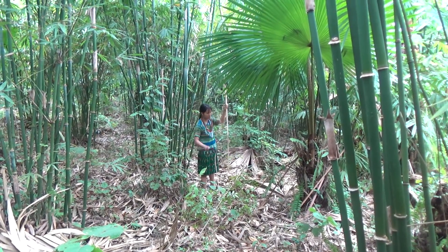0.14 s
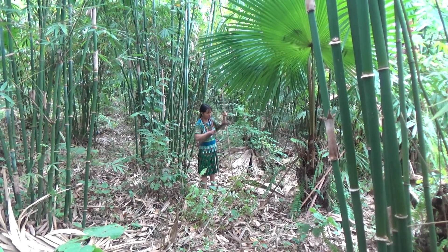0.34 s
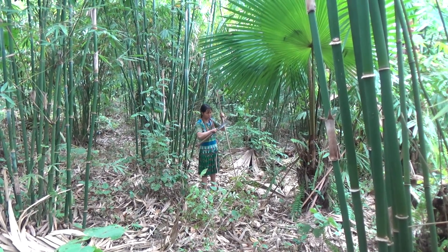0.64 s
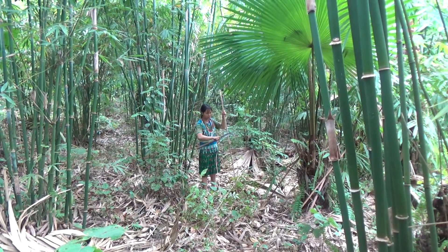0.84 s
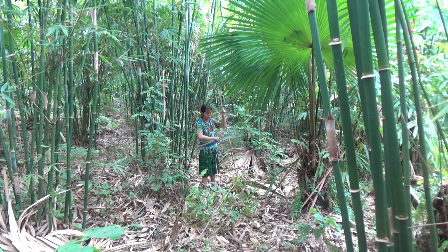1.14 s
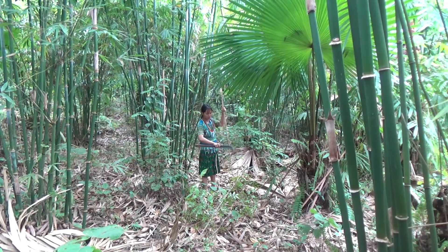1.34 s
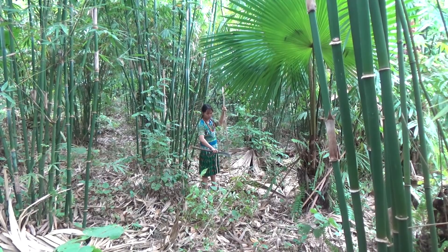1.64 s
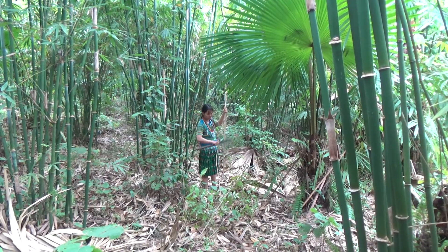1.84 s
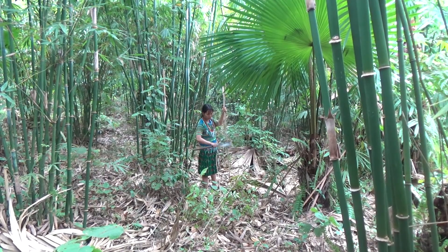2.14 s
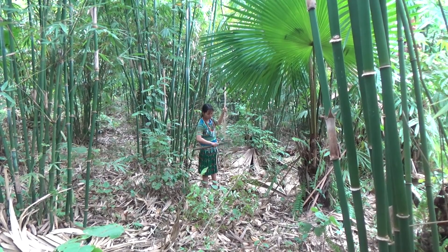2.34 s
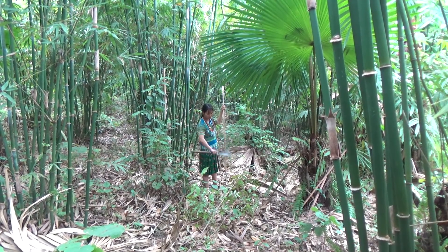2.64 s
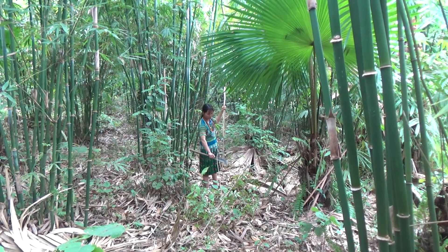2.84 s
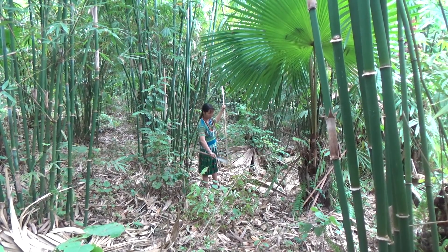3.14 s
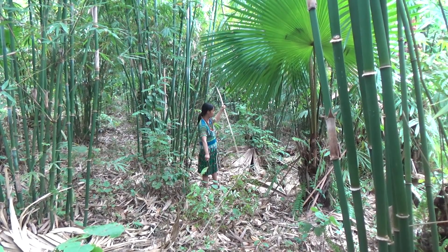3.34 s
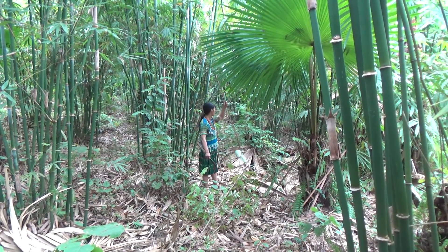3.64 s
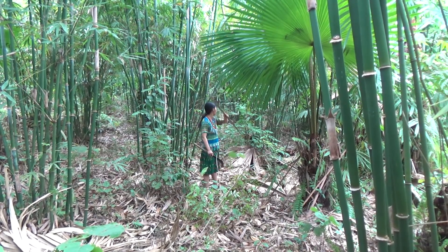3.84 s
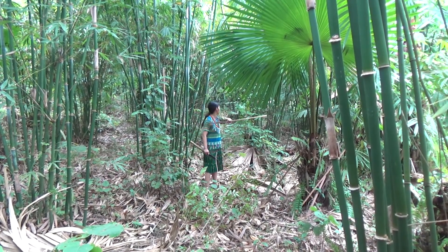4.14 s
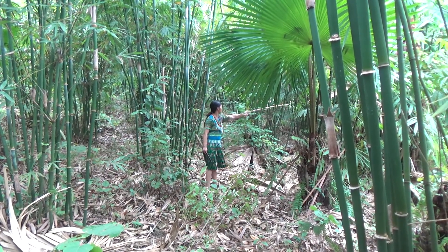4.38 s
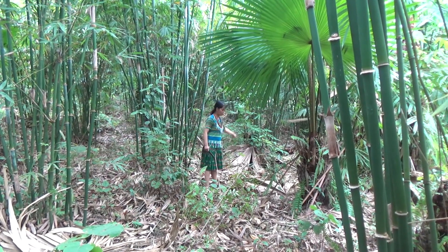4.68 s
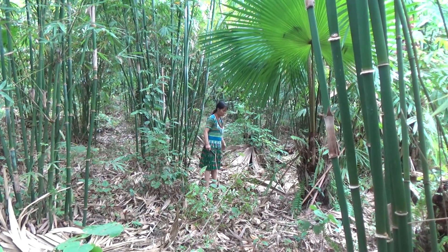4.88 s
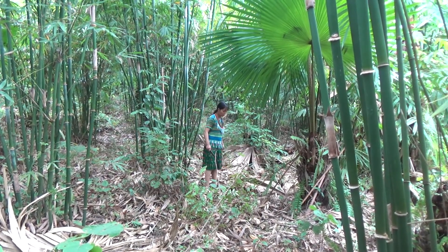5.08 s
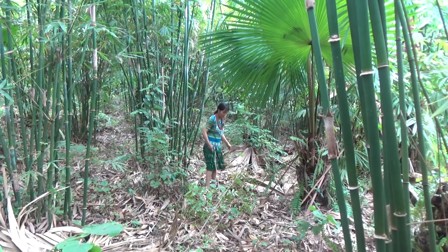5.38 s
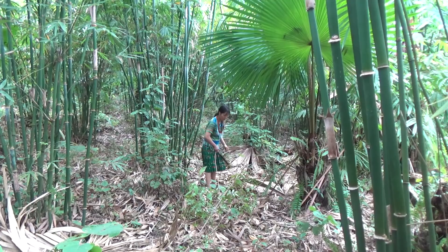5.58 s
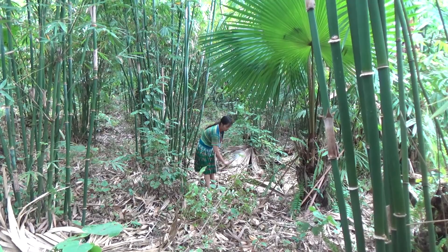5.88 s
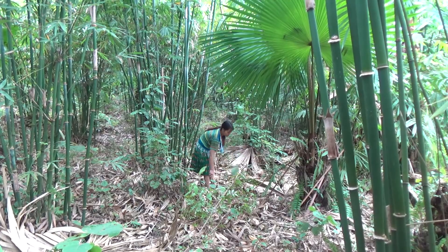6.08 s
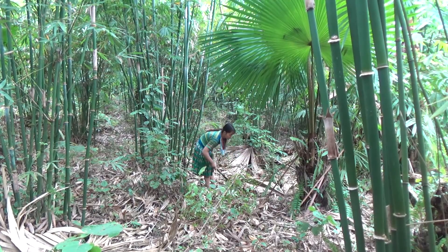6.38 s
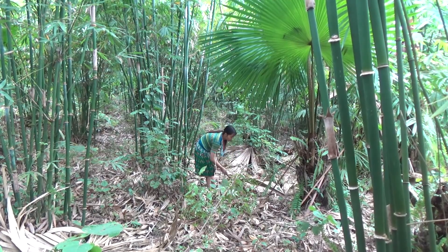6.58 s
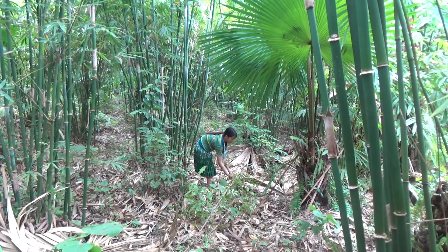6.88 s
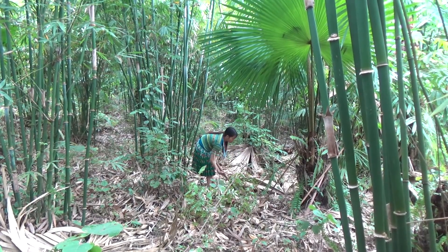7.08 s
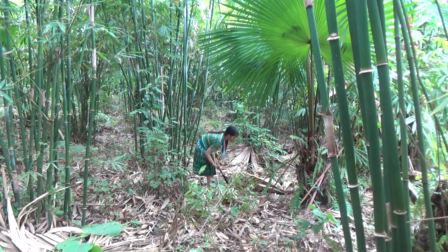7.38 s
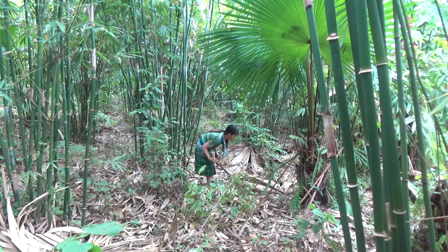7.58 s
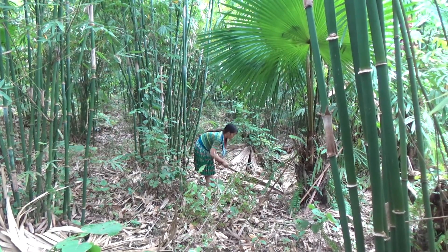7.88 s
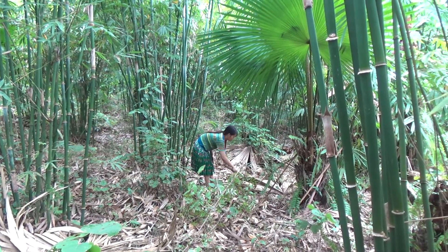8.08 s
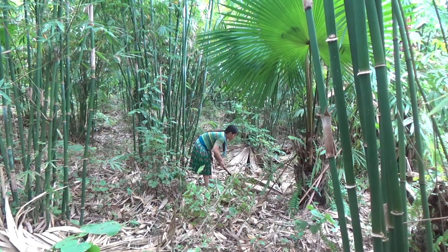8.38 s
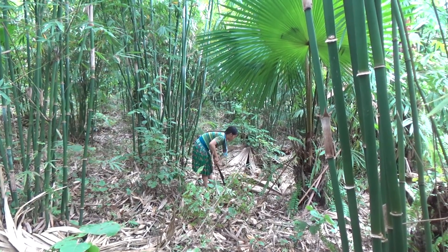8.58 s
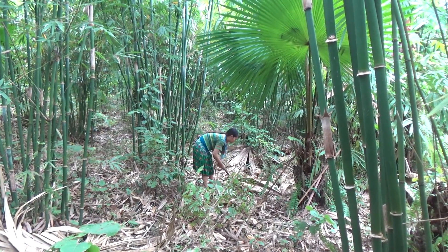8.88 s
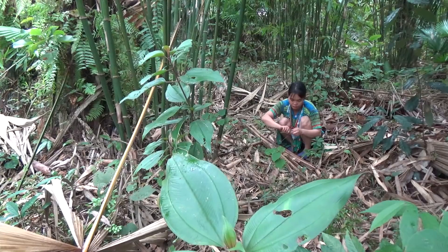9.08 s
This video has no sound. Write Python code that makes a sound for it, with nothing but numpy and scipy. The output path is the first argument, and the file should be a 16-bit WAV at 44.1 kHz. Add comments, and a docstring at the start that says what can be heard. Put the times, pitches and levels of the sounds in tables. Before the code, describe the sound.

Soft forest rumble and hiss run throughout, with a faint wavering whine like a small motor. From about 0.7 to 3 seconds a long steel blade scrapes along its sheath in short, catching strokes with a thin, high ring, the sharpest click at 1.2 seconds. A hollow bamboo cane knocks lightly in the hand between 2 and 4 seconds. Feet shuffle quietly in dry leaves from 3 seconds, and just after 5 the tossed cane lands with a swish. At 6 seconds comes a loud, slash-like crunch with sharp snaps. From about 7 to 7.7 seconds the leaves are raked and crushed while hollow stalks break. A far bird gives one very faint rising whistle around 8 seconds. A second slash-like crunch follows at 8.3, then a sharp snap and smaller crackles fading by 9. The grove adds short echoes, and the sound is nearly mono.

```python
"""A long steel blade scrapes along its sheath in a bamboo grove, sticking and slipping so the edge rings.
A hollow cane knocks in the hand and is tossed aside. Dry leaves crunch under steps, raking and what
sound like two blade slashes, and single stems snap. The canes scatter each sound back, over soft
forest noise, one far bird and a faint whine like a small motor's."""
import sys
import numpy as np
from scipy import signal
from scipy.fft import rfft, irfft
from scipy.io import wavfile
from scipy.ndimage import uniform_filter1d

SR = 44100
rng = np.random.default_rng(int(sys.argv[2]) if len(sys.argv) > 2 else 0)


def to_wav(s):
    """Save 16-bit WAV."""
    ch = np.atleast_2d(s).T  # columns
    pcm = np.round(np.clip(ch, -1, 1) * 32767)  # PCM
    wavfile.write(sys.argv[1], SR, pcm.astype(np.int16))


N = 406602

# Levels in the tables are relative: each layer gets its own trim in the mix.
# Strokes of the blade. Each row: start in seconds, length in seconds, level in dB.
BLADE_STROKES = [(.745, .075, -39.5), (.822, .022, -36), (1.027, .06, -60), (1.214, .042, -33.5),
                 (1.275, .06, -43), (1.322, .028, -38), (1.6, .07, -47), (1.674, .045, -41),
                 (1.894, .03, -47.5), (1.955, .06, -48), (2.112, .1, -41.5), (2.22, .06, -46.5),
                 (2.279, .015, -38.5), (2.392, .03, -53), (2.55, .15, -50.5), (2.694, .085, -44),
                 (2.96, .13, -58.5)]
# The edge catches on the sheath. Each row: start in seconds, level in dB.
EDGE_CATCHES = [(.6933, -32), (.7607, -28), (.7771, -25), (.8295, -25), (1.2384, -21), (1.2491, -13.5),
                (1.3464, -21), (1.514, -34.5), (1.5683, -32), (1.6302, -30), (1.6751, -24), (1.7085, -28),
                (1.9699, -27), (1.9984, -30), (2.1196, -27), (2.1465, -23), (2.2837, -21), (2.7087, -27)]
# The ring of the steel. Each row: pitch in Hz, 60 dB decay time in seconds, level in dB.
STEEL_MODES = [(3660, .04, -18), (4470, .035, -17), (6450, .05, -14), (7915, .15, -2.5), (7965, .11, -5),
               (9130, .11, -4), (9290, .09, -6), (10230, .1, -12), (10520, .12, -8), (11400, .1, -14),
               (11720, .14, -9), (13000, .14, -10), (14300, .12, -16)]
# EQ of the scrape. Each row: frequency in Hz, level in dB.
SCRAPE_EQ = [(200, -26), (750, -12), (1200, -14.5), (2100, -7.5), (3000, -9), (4200, -5), (5800, -5.5),
             (8000, -1.5), (10000, 2.5), (12500, -3.5), (15500, -11.5)]

# Knocks on the cane in the hand. Each row: start in seconds, level in dB.
CANE_KNOCKS = [(1.915, -38), (2.005, -37), (2.147, -37), (2.175, -35), (2.284, -36), (2.66, -40),
               (2.735, -40), (3.227, -29), (3.905, -35)]
# The ring of the cane. Each row: pitch in Hz, 60 dB decay time in seconds, level in dB.
CANE_MODES = [(740, .05, -15), (1610, .045, -2), (1880, .025, -4), (2150, .04, 0), (2500, .025, -3),
              (4420, .02, -2), (5300, .015, -4)]
# The cane lands. One row: start and length in seconds, attack share, release in seconds, level in dB.
CANE_LANDING = (5.147, .024, .2, .28, -31.3)
# EQ of the landing's swish. Each row: frequency in Hz, level in dB.
SWISH_EQ = [(60, -12), (140, 0), (330, -5), (500, -14), (800, -11), (1400, -2), (2600, 0), (3700, -1.5),
            (6500, 1), (10000, -3), (13000, -8), (15500, -17)]

# Crunches in the dry leaves, two of them big, slash-like sweeps. Each row: start in seconds, length in
# seconds, crackle level in dB, then hollow stems and ground thud, both in dB against the crackle.
LEAF_CRUSHES = [(3.224, .013, -43.5, -4, -18), (3.903, .008, -52, 1, -7), (6.033, .016, -32, -4, -15),
                (6.06, .012, -32, -5, -18), (6.074, .06, -23.7, -9.8, -21), (6.908, .02, -45, -6, -13),
                (7.008, .006, -37, -10, -25), (7.166, .046, -36.5, -3.5, -11.5),
                (7.257, .02, -38.5, -3, -15), (7.384, .023, -31.5, 1.5, -11.5), (7.434, .015, -26, -2, -15),
                (7.488, .016, -31, .5, -7.5), (7.555, .044, -40, -3, -13), (7.621, .055, -37.5, -7, -12),
                (7.789, .014, -46, -20, -20), (8.245, .01, -33, 1, -4), (8.254, .078, -27.3, -3.5, -13.5),
                (8.382, .013, -23.5, -17, -21), (8.502, .032, -40, 0, -9), (8.558, .052, -39.5, -10, -14),
                (8.998, .016, -43, -26, -24)]
# Light shifts of the feet. Each row: start in seconds, length in seconds, level in dB.
FOOT_SHUFFLES = [(.04, .2, -63), (3.1, .65, -54.5), (3.9, .65, -63.5), (5.06, .2, -54), (5.3, .42, -60.5),
                 (5.72, .13, -57), (5.94, .16, -54), (6.1, .34, -45), (6.36, .3, -54), (6.82, .32, -47.5),
                 (8.38, .23, -43), (8.58, .38, -54.5)]
# The swell of one long rake through the leaves. Each row: time in seconds, level in dB.
RAKE_SWELL = [(6.68, -57), (6.836, -56), (6.954, -52), (7.086, -41), (7.414, -36), (7.546, -37),
              (7.814, -61), (7.9, -62)]
# EQs of crisp leaves, hollow stems and the ground. Each row: frequency in Hz, level in dB.
LEAF_EQ = [(300, -22), (900, -15), (2000, -13.5), (4000, -6.5), (7000, 0.5), (10000, 0.5), (12500, -3),
           (15500, -9.5)]
STEM_EQ = [(150, -30), (400, -17), (720, -11.5), (1150, -11), (1550, -3), (2200, -.5), (2600, -1),
           (3100, -5.5), (4500, -6.5), (7000, -14), (12000, -40)]
GROUND_EQ = [(40, -36), (90, -15), (150, -3), (220, 0), (280, 1.5), (400, -9.5), (750, -11), (1300, -24),
             (3000, -40)]
# Single stems and leaf ribs snap. Each row: start in seconds, level in dB, pitch in Hz.
RIB_SNAPS = [(.122, -36, 9030), (3.3932, -33, 6980), (3.479, -31, 8240), (3.549, -33, 6820),
             (3.6344, -34, 6860), (4.143, -40, 4130), (4.2662, -42, 5920), (5.7468, -36, 7530),
             (5.8036, -34, 6610), (6.0418, -16, 9020), (6.0761, -4, 9490), (6.1074, -13, 10600),
             (6.127, -5, 9770), (6.912, -17.5, 8000), (6.9324, -17.5, 5570), (7.008, -5, 6180),
             (7.096, -24, 6900), (7.1831, -17, 4600), (7.2022, -16.5, 9050), (7.219, -17, 9050),
             (7.3302, -12, 7190), (7.387, -10, 7900), (7.4006, -8.5, 6020), (7.436, -12, 5320),
             (7.449, -14, 4240), (7.4906, -10.5, 5700), (7.4969, -9, 3480), (7.629, -13.5, 6190),
             (7.6734, -13.5, 11700), (7.7992, -24, 10400), (8.2485, -17, 6470), (8.3822, -1.5, 9220),
             (8.523, -13.5, 6440), (8.602, -15.5, 9490)]
# Hollow dry stalks break. Each row: start in seconds, level in dB, pitch in Hz.
STALK_BREAKS = [(6.066, -21, 1450), (6.11, -25, 800), (6.128, -20, 1500), (6.912, -24, 2600),
                (7.134, -25, 2300), (7.33, -16.5, 2450), (7.401, -9.5, 2170), (7.437, -13, 1850),
                (7.449, -16.5, 2050), (7.498, -14, 2100), (7.585, -22.5, 1900), (7.674, -20, 2450),
                (8.248, -15, 2470), (8.51, -25, 1850)]
# The ring of a stalk. Each row: multiple of its pitch, 60 dB decay time in seconds, level in dB.
STALK_MODES = [(.74, .016, -13), (.91, .022, -3), (1, .026, 0), (1.14, .02, -2), (1.31, .014, -5),
               (2.05, .01, -6)]

# EQ of the forest bed. Each row: frequency in Hz, level in dB.
FOREST_EQ = [(20, -44), (35, -14), (60, -7), (110, .5), (140, 3), (200, -2.5), (400, -7.5), (650, -12),
             (850, -9), (1010, -7), (1160, -13.5), (1400, -7), (1560, -14), (2600, -16), (4000, -18),
             (10000, -23), (15500, -26)]
# Partials of the motor whine. Each row: pitch in Hz, level in dB.
WHINE_PARTIALS = [(1028, -73.5), (1287, -76), (1416, -75.5)]
# The bird's rising whistle. Each row: time in seconds, pitch in Hz, level in dB.
BIRD_GLIDE = [(7.8, 2080, -100), (7.88, 2130, -70), (8.03, 2300, -70), (8.2, 2420, -70), (8.26, 2440, -100)]
# Stereo width. Each row: frequency in Hz, side level against the middle in dB.
WIDTH_EQ = [(60, -20), (110, -18), (200, -17), (380, -16), (700, -19), (1290, -21), (2380, -27),
            (4400, -29), (8120, -25), (15000, -31)]

RING_DB, RING_AT_DB = -4, -40  # send to the steel's ring, at this stroke level
RING_DAMPING = .25  # dB of that send lost per dB of harder stroke
STIR_STEM_DB, STIR_THUD_DB = -9, -16.5  # stems and ground against the leaves in light movement
RIB_RATE_PER_S, RIB_DB = 50, -10  # small ribs give way at random wherever the litter stirs
SETTLE_DB, SETTLE_T60_S = -15.5, .92  # leaves springing back: energy against the crush, decay time
REST_DB = -70  # drive of the litter at rest
CEILING, DROPOUT_START_S, DROPOUT_END_S = .5, 9.04, 9.059


def blade():
    """Steel sticks and slips along the sheath; every slip rings it, more freely under a light stroke."""
    rub_power, ring_power, ticks = np.zeros((3, N))
    for start, length, db in BLADE_STROKES:
        power = (undb(db) * push(length, attack_share=.4, t60=.17)) ** 2
        add(rub_power, start, power)
        add(ring_power, start, power * undb(RING_DB - RING_DAMPING * (db - RING_AT_DB)) ** 2)
    for start, db in EDGE_CATCHES:
        add(ticks, start, peak(crack(crack_t60=.008, flutter_t60=.035, flutter_db=-15), db))
    slips = grains(rate=5000, spread_db=2.8) * undb(1.5 * drift(80))
    drive = np.sqrt(ring_power) * slips + undb(-6) * ticks
    # the contact point travels along the edge, so the modes take turns
    steel = sum(undb(db) * resonate(drive * undb(4 * drift(16)), hz, t60) for hz, t60, db in STEEL_MODES)
    scrape = colour(np.sqrt(rub_power) * slips + ticks, SCRAPE_EQ)
    return undb(-1.8) * scrape + undb(-6.3) * steel


def cane():
    """The hollow cane knocks as it is handled, then lands in the leaves with a swish."""
    knocks, landing = np.zeros((2, N))
    for start, db in CANE_KNOCKS:
        # each knock rings at slightly different pitches
        modes = [(hz * (1 + .03 * rng.standard_normal()), t60, level) for hz, t60, level in CANE_MODES]
        add(knocks, start, peak(strike(modes), db))
    start, length, attack_share, t60, db = CANE_LANDING
    add(landing, start, undb(db) * push(length, attack_share, t60))
    swish = colour(landing * grains(rate=12000, spread_db=1.8), SWISH_EQ)
    return knocks + undb(-1.4) * swish


def leaf_litter():
    """Thin leaves crackle, hollow stems crunch lower, and the ground under them thuds."""
    crush_power, stem_power, thud_power = np.zeros((3, N))
    for start, length, db, stem_db, thud_db in LEAF_CRUSHES:
        power = (undb(db) * push(length, attack_share=.12, t60=.12)) ** 2
        add(crush_power, start, power)
        add(stem_power, start, power * undb(stem_db) ** 2)
        add(thud_power, start, power * undb(thud_db) ** 2)
    stir_power = stirring() + settling(crush_power)
    leaf_power = crush_power + stir_power
    stem_power += stir_power * undb(STIR_STEM_DB) ** 2
    thud_power += stir_power * undb(STIR_THUD_DB) ** 2
    # leaves give way in small clusters; a light touch breaks few, a firm one very many
    clusters = undb(1.5 * drift(150))
    firmness = leaf_power / (leaf_power + undb(-38) ** 2)
    dense = np.sqrt(firmness) * grains(rate=6000, spread_db=2.9)
    sparse = np.sqrt(1 - firmness) * grains(rate=1500, spread_db=3.3)
    rib_clicks = np.sqrt(stir_power) * grains(rate=RIB_RATE_PER_S, spread_db=1.5)
    ribs = through(rib_clicks, crack(crack_t60=.006, flutter_t60=.03, flutter_db=-22))
    leaves = colour(np.sqrt(leaf_power) * clusters * (dense + sparse) + undb(RIB_DB) * ribs, LEAF_EQ)
    stems = colour(np.sqrt(stem_power) * clusters * grains(rate=2000, spread_db=2.6), STEM_EQ)
    ground = colour(np.sqrt(thud_power) * rng.standard_normal(N), GROUND_EQ)
    return leaves + stems + ground


def stirring():
    """Power of the light movement in the litter: shuffles that swell and ebb, and one long rake."""
    rake_db = np.interp(np.arange(N) / SR, *np.transpose(RAKE_SWELL), left=-np.inf, right=-np.inf)
    power = undb(REST_DB) ** 2 + undb(rake_db - 1) ** 2
    for start, length, db in FOOT_SHUFFLES:
        add(power, start, undb(db) ** 2 * np.hanning(int(length * SR)))
    return power


def settling(crush_power):
    """Power of bent leaves springing back: it builds with the crush and dies away slowly."""
    feedback = fade(1 / SR, SETTLE_T60_S) ** 2
    return undb(SETTLE_DB) ** 2 * signal.lfilter([1 - feedback], [1, -feedback], crush_power)


def snaps():
    """Each breaking rib cracks around its own pitch; hollow stalks add a short woody ring."""
    breaks = np.zeros(N)
    for start, db, hz in RIB_SNAPS:
        # big pieces flutter on for longer
        burst = crack(crack_t60=.005, flutter_t60=.03 + .03 * undb(db), flutter_db=-24)
        hump = [(hz / 12, -36), (hz / 2.2, -10), (hz / 1.3, -1),
                (hz, 1.5), (hz * 1.4, -3), (hz * 2.4, -14)]
        crisp_edge = colour(crack(crack_t60=.004, flutter_t60=.02, flutter_db=-22), LEAF_EQ)
        add(breaks, start, peak(colour(burst, hump) + undb(-11) * crisp_edge, db - 2.4))
    for start, db, hz in STALK_BREAKS:
        # no two stalks split alike
        modes = [(hz * ratio * (1 + .025 * rng.standard_normal()), t60, level)
                 for ratio, t60, level in STALK_MODES]
        add(breaks, start, peak(strike(modes), db - .6))
    return signal.lfilter(*signal.butter(2, 300, "high", fs=SR), breaks)  # small pieces radiate no bass


def grove(x, near_db, near_t60, far_db, far_t60):
    """Ground and nearby canes return quick echoes; the far canes a thin, duller tail."""
    t = np.arange(SR) / SR
    echoes = rng.standard_normal(SR) * (rng.random(SR) < .06) * fade(t, near_t60) * (t > .001)
    tail = rng.standard_normal(SR) * fade(t, far_t60) * (1 - fade(t, .06))
    tail = signal.lfilter(*signal.butter(1, 9000, fs=SR), tail)
    return x + undb(near_db) * through(x, echoes) + undb(far_db) * through(x, tail)


def forest():
    """A soft, almost steady bed of rumble and hiss."""
    return colour(rng.standard_normal(N), FOREST_EQ, size=8192) * undb(-56.3 + .3 * drift(3))


def motor_whine():
    """A small motor's faint partials, each wavering in pitch and level."""
    return sum(tone(hz * (1 + .0029 * drift(25)), db - 1 + 2.5 * drift(7)) for hz, db in WHINE_PARTIALS)


def far_bird():
    """One faint whistle glides upward with a rough flutter in its pitch."""
    times, *curves = np.transpose(BIRD_GLIDE)
    hz, db = (np.interp(np.arange(N) / SR, times, curve) for curve in curves)
    return tone(hz * (1 + .03 * drift(300)), db)


def push(length, attack_share, t60):
    """Pressure of one movement: it builds over a share of its length, holds, then lets go."""
    t = np.arange(int(.7 * SR)) / SR
    attack = np.clip(t / max(attack_share * length, 1e-4), 0, 1) ** 1.4
    return attack * fade(t - length, t60)


def grains(rate, spread_db):
    """Tiny slips or fractures, rate per second at random, many weak and a few strong; rms 1."""
    strength = np.minimum(rng.exponential(size=N), 5)
    clicks = (rng.random(N) < rate / SR) * rng.choice([-1, 1], N) * undb(spread_db * strength)
    return clicks / clicks.std()


def crack(crack_t60, flutter_t60, flutter_db):
    """A break that runs through the piece in about a millisecond, and the short flutter after it."""
    t = np.arange(SR // 8) / SR
    decay = fade(t, crack_t60) + undb(flutter_db) * fade(t, flutter_t60)
    return rng.standard_normal(len(t)) * (1 - fade(t, .006)) * decay


def strike(modes):
    """A brief, rough contact rings a set of (Hz, t60, dB) modes."""
    t = np.arange(SR // 8) / SR
    tap = rng.standard_normal(len(t)) * (fade(t, .002) + undb(-15) * fade(t, .03))
    body = sum(undb(db) * fade(t, t60) * np.cos(2 * np.pi * hz * t) for hz, t60, db in modes)
    return signal.fftconvolve(tap, body)[:len(t)]


def resonate(x, hz, t60):
    """One mode driven all the time; keeps the power of white noise."""
    width_hz = np.log(1000) / np.pi / max(t60, .005)
    return signal.lfilter(*signal.iirpeak(hz, hz / width_hz, fs=SR), x) * np.sqrt(SR / np.pi / width_hz)


def colour(x, points, size=1024):
    """Minimum-phase EQ through (Hz, dB) points; keeps the power of white noise."""
    cepstrum = irfft(np.log(undb(eq_curve(points, size))))
    cepstrum[1:size // 2] *= 2
    cepstrum[size // 2 + 1:] = 0
    response = irfft(np.exp(rfft(cepstrum)))
    return through(x, response)[:len(x)]


def eq_curve(points, size):
    """Level in dB at each FFT bin, joining (Hz, dB) points on a log frequency axis."""
    hz, db = np.transpose(points)
    bins = np.maximum(np.arange(size // 2 + 1) * SR / size, 1)
    return np.interp(np.log(bins), np.log(hz), db)


def through(x, response):
    """Pass a sound through a response scaled to unit energy."""
    return signal.fftconvolve(x, response / np.linalg.norm(response))[:N]


def tone(hz, db):
    """A sine on a moving pitch at an rms level."""
    return undb(db) * np.sqrt(2) * np.sin(2 * np.pi * np.cumsum(hz) / SR)


def drift(rate):
    """Smooth random modulation, rate turns per second, with a spread near 1."""
    hold = int(SR / rate)
    return uniform_filter1d(np.repeat(rng.standard_normal(N // hold + 1), hold), hold)[:N]


def fade(t, t60):
    """Exponential decay from t = 0, down 60 dB after t60 seconds."""
    return np.exp(-np.log(1000) * np.maximum(t, 0) / max(t60, 1e-4))


def peak(x, db):
    """Scale a sound to a peak level."""
    return undb(db) * x / np.abs(x).max()


def undb(db):
    """Decibels to gain."""
    return 10 ** (np.asarray(db) / 20)


def add(track, start, sound):
    """Mix a sound into the track at start seconds."""
    i = max(int(start * SR), 0)
    track[i:i + len(sound)] += sound[:N - i]


def narrow_stereo(mid, side_db):
    """Left and right are nearly the same; only a small, diffuse part differs."""
    t = np.arange(SR // 8) / SR
    diffuse = through(mid, rng.standard_normal(len(t)) * fade(t, .14))
    side = irfft(rfft(diffuse) * undb(side_db + eq_curve(WIDTH_EQ, N)), N)
    return np.array([mid + side, mid - side])


def scene():
    """Blade, cane and leaves echo in the grove, over forest, whine and bird."""
    foley = undb(-.3) * blade() + cane() + undb(-1.5) * leaf_litter() + snaps()
    in_grove = grove(foley, near_db=-7.5, near_t60=.068, far_db=-12.5, far_t60=.42)
    return narrow_stereo(in_grove + forest() + motor_whine() + far_bird(), side_db=-.5)


def record(dry):
    """Saturation rounds the sharpest cracks, the sound drops out briefly near the end, the top is cut."""
    t = np.arange(N) / SR
    gate = (t < DROPOUT_START_S) | (t > DROPOUT_END_S)
    rounded = CEILING * np.tanh(dry / CEILING)
    high_cut = signal.ellip(10, .2, 70, 15750, fs=SR, output="sos")
    return signal.sosfilt(high_cut, rounded * gate)


dry = scene()
out = record(dry)
to_wav(out)
```